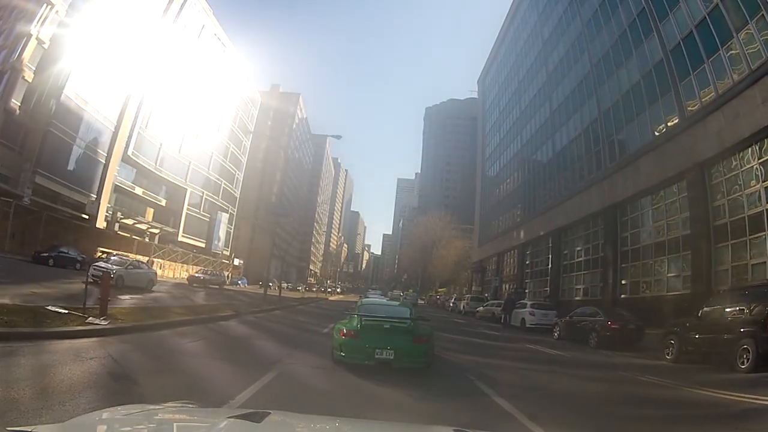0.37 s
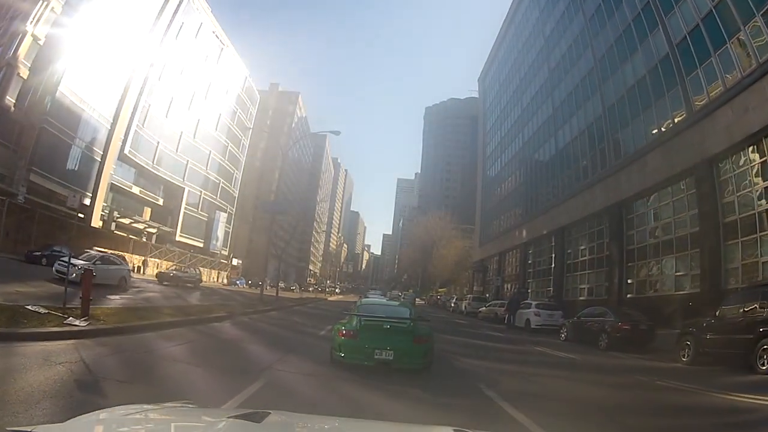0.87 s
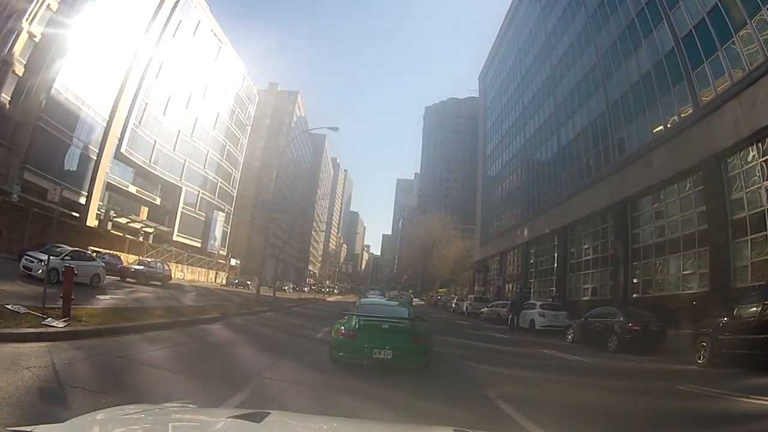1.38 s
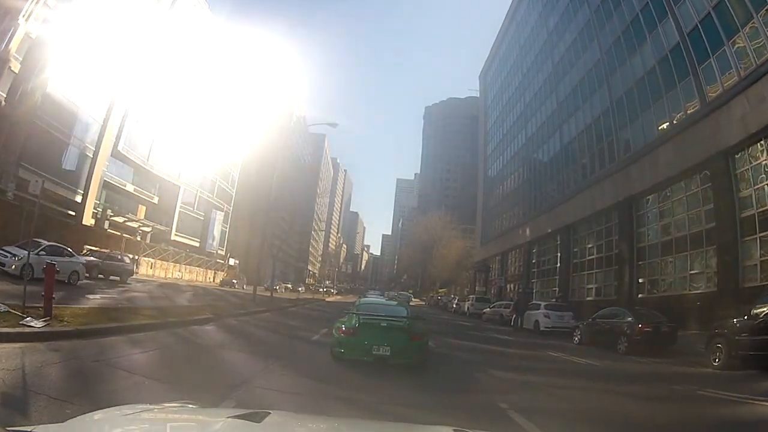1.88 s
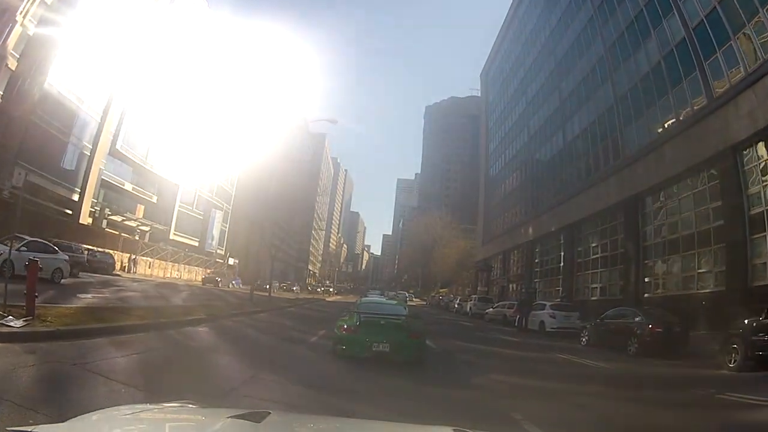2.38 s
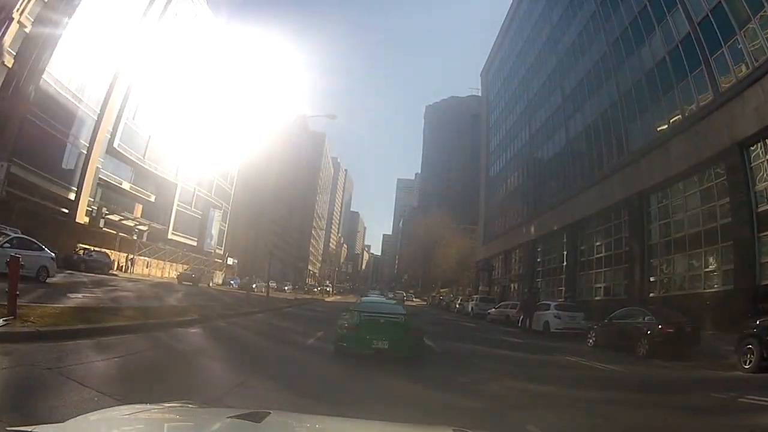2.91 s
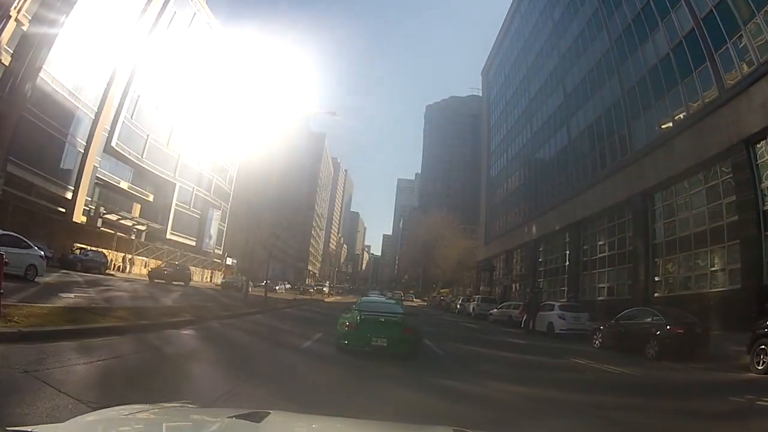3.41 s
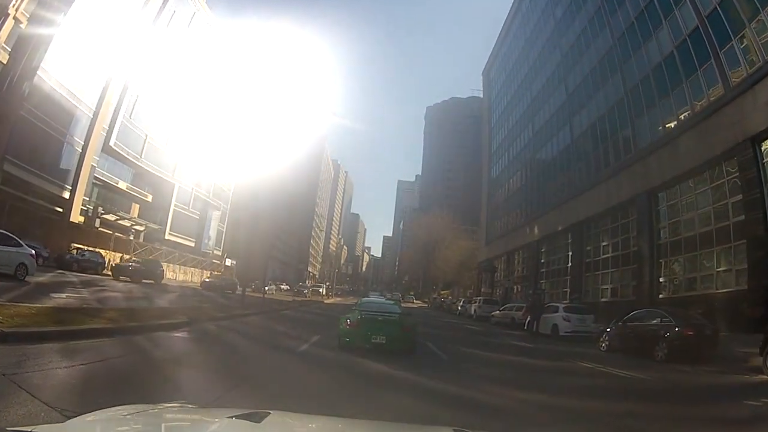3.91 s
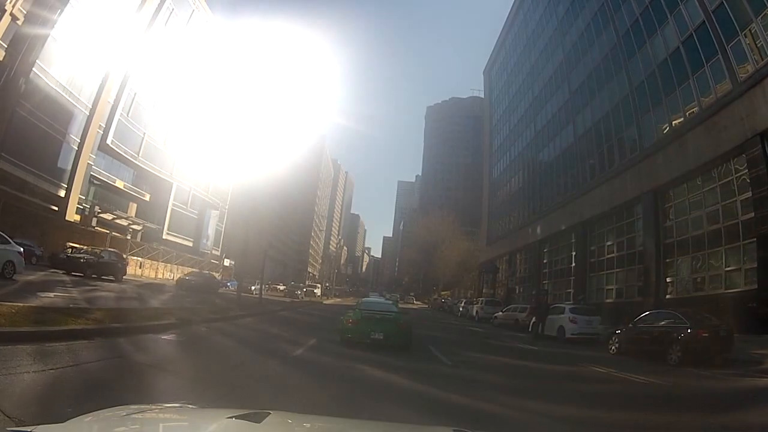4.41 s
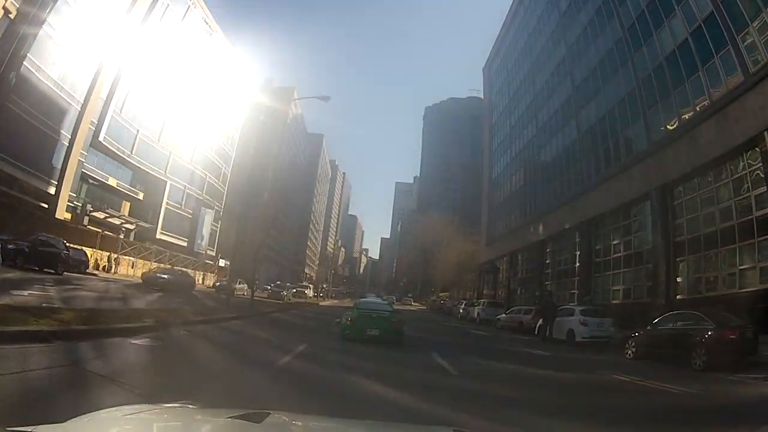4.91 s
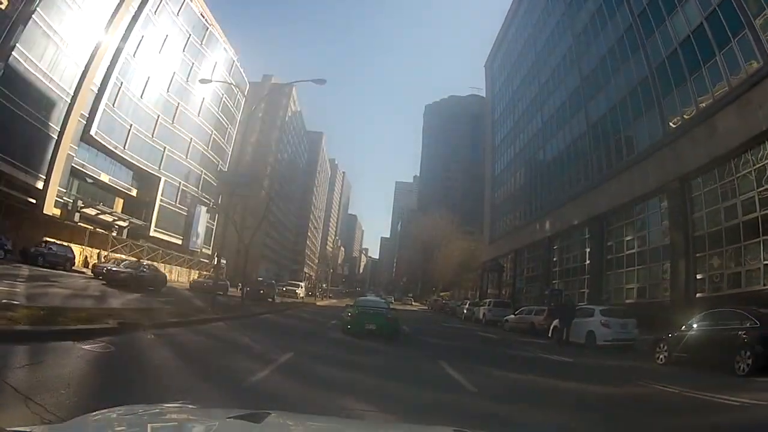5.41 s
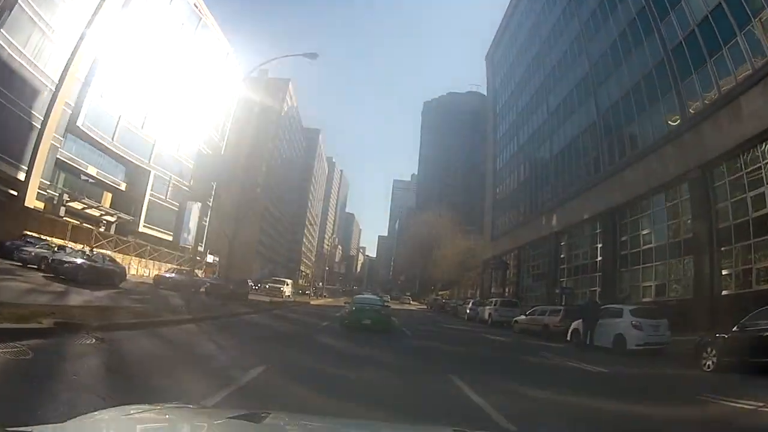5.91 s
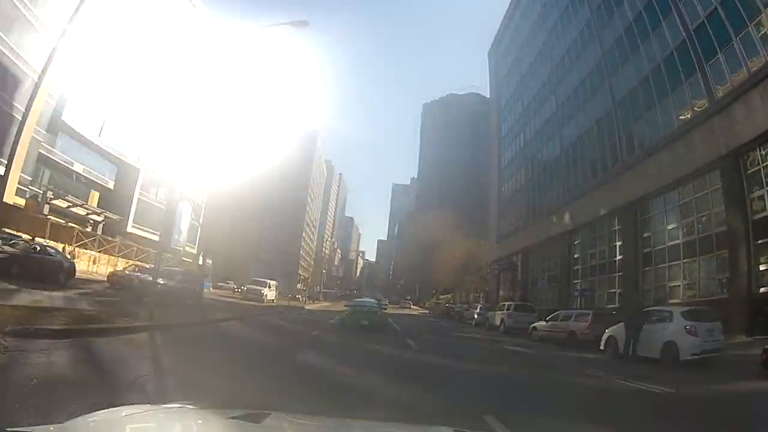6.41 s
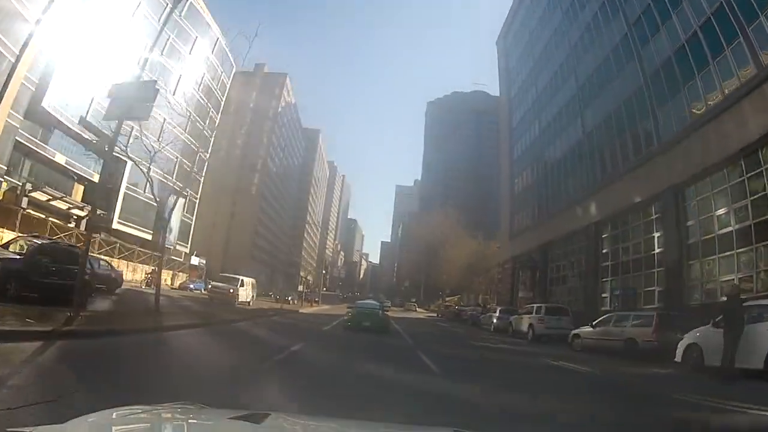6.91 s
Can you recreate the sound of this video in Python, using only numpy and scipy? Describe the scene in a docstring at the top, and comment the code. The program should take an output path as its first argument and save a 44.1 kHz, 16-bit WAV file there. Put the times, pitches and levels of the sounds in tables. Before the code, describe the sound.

A cheap small microphone inside a moving car picks up boomy road rumble, thuds and a rough low idle. Another car's engine wails up and down ahead; our own flares quickly, then falls back through a buzzing rattle. A further engine hums faintly. More surges follow before our engine pulls away, growing loud, hard and raspy at the end.

```python
"""A small camera's microphone inside a sports car, in a street between tall buildings.
From the start the idle is crank tones, firing-puffed roar and ringing cabin noise, over rumble and bumps.
Another car ahead, swept tones heard through resonances, revs in surges. Our engine is blipped and sags;
the trim rattles, struck on the shake, and a further engine hums as a single tone. At the end our car pulls away.
The microphone signal is sampled slowly and each value held, which mirrors the sound in the treble."""
import sys
import numpy as np
from scipy import signal
from scipy.fft import next_fast_len
from scipy.io import wavfile
from scipy.ndimage import uniform_filter1d

SR = 44100
rng = np.random.default_rng(int(sys.argv[2]) if len(sys.argv) > 2 else 0)


def transcribe(u):
    """Save the signal u as a 16-bit wav file named by the first command-line argument.

    u: samples, shape (n,) or (channels, n), limited to [-1, 1]; the rate is SR.
    q: integer samples, one column per channel.
    """
    v = np.clip(np.atleast_2d(u).T, -1, 1)
    q = np.round(v * 32767).astype(np.int16)
    wavfile.write(sys.argv[1], SR, q)


def convert_level_to_amplitude(level_db):
    """Map a level in decibels to its linear amplitude factor."""
    exponent = np.asarray(level_db, float) / 20
    return 10 ** exponent


N = 310905  # length in samples


def evened(x):
    """Scales to rms 1."""
    return x / np.sqrt(np.mean(x ** 2) + 1e-20)


def columns(rows):
    """Sample indices a table spans and its columns at each of them."""
    s, *rest = np.transpose(rows)
    at = np.arange(max(round(s[0] * SR), 0), min(round(s[-1] * SR), N))
    return at, [np.interp(at / SR, s, c) for c in rest]


def whole(rows):
    """Columns of a table at every sample of the scene."""
    s, *rest = np.transpose(rows)
    return [np.interp(np.arange(N) / SR, s, c) for c in rest]


def read(points, hz):
    """A (f/Hz, level/dB) table at the given frequencies."""
    f, level = np.transpose(points)
    return np.interp(np.log(hz), np.log(f), level)


def resonate(x, hz, width):
    """A fixed resonance of about unit gain at its peak."""
    pole = np.exp((2j * np.pi * hz - np.pi * width) / SR)
    return 2 * signal.lfilter([1 - abs(pole)], [1, -pole], x).real


def resonate_twice(x, hz, width):
    """The same resonance passed twice, for steeper skirts."""
    return resonate(resonate(x, hz, width), hz, width)


def wander(length, rate_hz):
    """Slow chance: normal random knots joined by straight lines."""
    knots = rng.standard_normal(int(length * rate_hz / SR) + 3)
    return np.interp(np.arange(length) * rate_hz / SR, np.arange(len(knots)), knots)


def noise(points, patchy_db):
    """Noise of rms 1 with a given spectrum and patches that drift over time and frequency."""
    frames, hz = N // 512 + 5, np.fft.rfftfreq(2048, 1 / SR)
    a, b, patches = rng.standard_normal((frames, 1025, 3)).T
    patches = evened(uniform_filter1d(uniform_filter1d(patches, 12, 0), 6, 1))
    f, level = np.transpose(points)
    shape = np.interp(np.log(hz + 1), np.log(f + 1), level)[:, None]
    spectrum = (a + 1j * b) * convert_level_to_amplitude(shape + patchy_db * patches)
    return evened(signal.istft(spectrum, nperseg=2048, noverlap=1536)[1][:N])


def tone(turns, multiple, level_db, waver_db):
    """One crank order; uneven burning and street echoes make its level and phase waver."""
    phase = 2 * np.pi * (multiple * turns + rng.random()) + 0.055 * wander(len(turns), 14)
    return np.sqrt(2) * convert_level_to_amplitude(level_db + waver_db * wander(len(turns), 14)) * np.cos(phase)


# crank of our own engine: (t/s, f/Hz in turns)
CRANK_SPEED = [(0.0, 16.2), (0.9, 16.4), (1.2, 17.5), (1.27, 19.3), (1.31, 22.8), (1.5, 53.9), (1.6, 66.2),
               (1.65, 68.3), (1.8, 69.2), (1.95, 67.1), (2.1, 61.9), (2.3, 51.7), (2.5, 46.0), (2.7, 40.9),
               (3.1, 26.8), (3.3, 21.2), (3.5, 17.6), (3.7, 16.4), (4.1, 20.5), (4.7, 22.8), (5.1, 20.2),
               (5.5, 23.5), (6.1, 29.8), (6.38, 35.0), (6.62, 42.3), (6.86, 51.2), (6.98, 57.7),
               (7.05, 60.7)]
# load and air of our own engine: (t/s, pull on the firing tones/dB, roar level/dB, hiss level/dB)
ENGINE_LOAD = [(0.0, -5, -56, -68.5), (0.39, -2.5, -50.5, -68.5), (0.88, -7, -47.5, -61),
               (1.2, -3, -49, -64.5), (1.33, 7, -47.5, -66), (1.43, 8.5, -46, -65.5),
               (1.5, 9, -40.5, -61.5), (1.6, 12, -35.5, -57.5), (1.68, 8, -31.5, -50.5),
               (1.78, 3, -36.5, -57.5), (2.1, 4, -39, -59.5), (2.17, -7, -41.5, -63), (2.32, 0, -42, -63.5),
               (2.5, -2.5, -44.5, -65.5), (3.05, -12.5, -48.5, -66), (3.3, -2.5, -45.5, -62.5),
               (4.0, -4, -47.5, -65), (4.5, 4, -44.5, -63.5), (4.85, -4.5, -42.5, -61),
               (5.5, -0.5, -41.5, -64), (6.2, 4, -40, -63), (6.46, 5, -39.5, -61.5), (6.51, 7, -36.5, -61),
               (6.6, 14, -35.5, -60), (6.85, 15, -31.5, -57), (6.95, 19, -30, -54.5),
               (7.05, 13, -28, -53.5)]
# once-a-turn shake before pull, largest where the crank turns at the body boom: (f/Hz in turns, level/dB)
SHAKE_BY_SPEED = [(16, -53), (24, -49), (30, -31), (37.5, -37), (41, -21.5), (44.5, -10.5), (48, -15.5),
                  (52, -29), (60, -37), (69, -32)]


def shake_level():
    """Level of the once-a-turn shake, which needs a moment to build up."""
    pull_share, build_s = 0.36, 0.056  # dB of shake per dB of pull; seconds
    keep = np.exp(-1 / (build_s * SR))
    steady = convert_level_to_amplitude(read(SHAKE_BY_SPEED, whole(CRANK_SPEED)[0]) + pull_share * whole(ENGINE_LOAD)[0])
    return signal.lfilter([1 - keep], [1, -keep], steady)


# road rumble under the cabin, apart from bumps: (t/s, level/dB)
ROAD_LEVEL = [(0.0, -33.5), (0.14, -33), (0.55, -29.5), (0.7, -34), (1.06, -29.5), (1.39, -23.5),
              (1.53, -22), (1.75, -23.5), (2.0, -25.5), (2.15, -25.5), (2.45, -24), (2.85, -26),
              (3.3, -29.5), (3.9, -29), (4.3, -26.5), (4.9, -23), (5.15, -27.5), (5.38, -20), (5.6, -27),
              (6.28, -20.5), (6.62, -25), (6.88, -19), (7.05, -30)]
# its spectrum at the microphone: (f/Hz, relative level/dB per Hz)
ROAD_SPECTRUM = [(12, -33.5), (26, -10.5), (36, -3), (43, 2), (58, -8), (72, -11.5), (97, -4.5), (192, 4.5),
                 (216, 3.5), (240, -6), (313, -30), (410, -11.5), (594, -31.5), (700, -26), (910, -67.5),
                 (1540, -120)]
# bumps that ring the body boom: (t/s of the peak, swing level/dB, length/s)
ROAD_BUMPS = [(0.132, -27.5, 0.12), (0.26, -33, .16), (0.481, -27, 0.217), (0.8, -32, 0.18),
              (1.04, -29.5, 0.26), (1.516, -30, .24), (1.84, -28, .16), (1.986, -32, .1), (2.536, -22, .25),
              (2.708, -31, .12), (2.853, -29, .09), (2.945, -21.5, 0.12), (3.081, -26, 0.076),
              (3.273, -19, 0.074), (3.452, -28, 0.77), (3.76, -30, 0.29), (3.998, -17.5, 0.175),
              (4.234, -38, 0.21), (4.44, -29, 0.29), (4.744, -20.5, 0.099), (4.859, -23.5, 0.13),
              (5.092, -24.5, .18), (5.24, -25.5, .1), (5.384, -24, 0.37), (5.757, -22.5, 0.18),
              (6.008, -19.5, 0.38), (6.193, -18, 0.092), (6.572, -17, 0.34), (6.963, -20.5, .24)]


def road():
    """Bumps ring the body boom where the crank shake does not already drive it, over a lumpy rumble."""
    rest_db, bump_rumble_db = -43, -18.5  # boom between bumps; rumble relative to a bump's swing
    t = np.arange(N) / SR
    jolts = sum(convert_level_to_amplitude(db) * np.cos(np.pi * np.clip((t - s) / length, -.5, .5)) ** 2
                for s, db, length in ROAD_BUMPS)
    swing = jolts + convert_level_to_amplitude(rest_db)
    free = np.clip(1 - 1.2 * shake_level() / swing, .1, 1)
    boom = resonate_twice(rng.standard_normal(N), hz=44.97, width=7.4)
    envelope = abs(signal.hilbert(boom, next_fast_len(N))[:N])
    steadier = boom / (envelope / boom.std() + .35)  # less uneven than pure chance
    rumble = np.hypot(convert_level_to_amplitude(whole(ROAD_LEVEL)[0]), convert_level_to_amplitude(bump_rumble_db) * jolts)
    return swing * free * evened(steadier) + rumble * noise(ROAD_SPECTRUM, patchy_db=2.5)


# a further engine, one table a passage: (t/s, firing f/Hz, level/dB)
FURTHER_ENGINE = [
    [(2.5, 175.3, -49), (2.75, 186.5, -18.5), (2.9, 196.9, -28), (3.0, 197, -23.5), (3.15, 200, -31),
     (3.3, 204.8, -28.5), (3.5, 211.4, -28.5), (3.7, 217.8, -34)],
    [(4.1, 190, -36), (4.2, 187.4, -26), (4.35, 188.6, -29.5), (4.5, 192.8, -23.5), (4.7, 195, -26),
     (4.9, 197, -25), (5.05, 195, -24.5)],
    [(5.0, 171.7, -40), (5.3, 174.7, -33.5), (5.45, 180.4, -32), (5.6, 185.8, -27.5), (5.8, 192.2, -26),
     (6.1, 200.5, -47), (6.3, 201.7, -28), (6.4, 204.3, -18), (6.5, 208.2, -22.5)],
]


def further_engine():
    """A third engine hums on its firing tone, each passage fading in and out."""
    out = np.zeros(N)
    for rows in FURTHER_ENGINE:
        at, (hz, db) = columns(rows)
        hum = tone(np.cumsum(hz) / SR, 1, db, waver_db=3.9)
        out[at] += hum * signal.windows.tukey(len(at), .12)
    return out


# the car ahead, one table a surge: (t/s, crank f/Hz in turns, level/dB before street and cabin)
AHEAD_SURGES = [
    [(0.4, 59.5, -46.5), (0.5, 62.84, -50.5), (0.7, 75.6, -29.5), (0.9, 80.3, -30.5), (1.0, 79.23, -29.5),
     (1.3, 71.85, -34.5), (1.5, 70.1, -39)],
    [(1.9, 80.9, -48), (2.0, 83.05, -26), (2.1, 85.36, -35), (2.2, 79.69, -29.5), (2.4, 76, -47)],
    [(3.0, 70.45, -53.5), (3.1, 76.13, -39), (3.2, 79.19, -33.5), (3.32, 86.53, -33), (3.5, 89.2, -33),
     (3.6, 85.45, -30.5), (3.8, 78.22, -36.5), (4.0, 71.07, -33.5), (4.12, 69.4, -45), (4.22, 70.97, -34),
     (4.4, 77.76, -32.5), (4.6, 89.32, -27), (4.8, 94.06, -28.5), (5.0, 97.16, -28)],
    [(5.0, 71, -25), (5.12, 70.73, -36), (5.22, 71.9, -30), (5.5, 80.07, -24), (5.7, 84.45, -27),
     (5.8, 83.5, -32), (5.9, 91.86, -41)],
]
# one row a surge: (second order/dB, upper orders/dB), both relative to the surge's level
AHEAD_BALANCE = [(-3.5, -10), (-5.5, -3), (-5, -6.5), (-19, 1)]
# its upper crank orders: (multiple of the crank, relative level/dB)
AHEAD_UPPER = [(4.5, -16.5), (5, -22.5), (6, -17.5), (9, -25)]
# how street and cabin pass its tones: (f/Hz, gain/dB)
STREET_AND_CABIN = [(120, -5), (140, -3), (165, 1), (185, 8.5), (200, 10), (215, 6.5), (240, 3.5),
                    (270, -8.5), (292, -17)]


def car_ahead():
    """Crank orders of the car ahead rise and fall in surges, the upper ones let in by two cabin resonances."""
    out = np.zeros(N)
    for rows, (low_db, bright_db) in zip(AHEAD_SURGES, AHEAD_BALANCE):
        at, (hz, level_db) = columns(rows)
        second_db = level_db + low_db + read(STREET_AND_CABIN, 2 * hz)
        firing_db = level_db + read(STREET_AND_CABIN, 3 * hz)
        turns = np.cumsum(hz) / SR
        surge = tone(turns, 2, second_db, waver_db=2.5) + tone(turns, 3, firing_db, waver_db=1.13)
        upper = sum(tone(turns, k, level_db + bright_db + db, waver_db=2.5) for k, db in AHEAD_UPPER)
        surge += resonate(upper, 402, 32) + resonate(upper, 698, 90)
        out[at] += surge * signal.windows.tukey(len(at), .12)
    return out


# cabin modes around the microphone: (t/s of the start, f/Hz, level/dB, length/s)
SWEPT_MODES = [(1.399, 269.3, -30, 0.22), (1.463, 380.7, -28, 0.17), (1.51, 546, -28.5, 0.16),
               (1.559, 920, -44, 0.097), (1.664, 1105, -38.5, 0.2), (1.918, 1083, -37.5, 0.078),
               (2.26, 482, -37.5, 0.13), (3.854, 268.4, -37.5, 0.16), (1.43, 46.1, -20, .18),
               (6.78, 45.9, -10.5, .27)]


def swept_modes():
    """Cabin modes that keep sounding for a moment after a crank order sweeps through them."""
    out = np.zeros(N)
    for s, hz, db, length in SWEPT_MODES:
        t = np.arange(round(length * SR)) / SR
        ring = tone(hz * t, 1, db, waver_db=3.5) * signal.windows.tukey(len(t), .6)
        out[round(s * SR):][:len(t)] += ring
    return out


# spectrum of the hiss in the cabin: (f/Hz, relative level/dB per Hz)
HISS_SPECTRUM = [(1530, -42.5), (2600, -23), (3240, -11.5), (3640, 0.5), (3860, -3), (4490, -10.5),
                 (4830, -12.5), (5290, -12.5), (6000, -17), (7800, -62), (13200, -120)]


def hiss_and_grit(hiss_db):
    """Air hisses, and grit flecking the body strikes a panel resonance at random."""
    fleck = rng.random(N) < 45 / SR  # 45 a second on average
    grit = convert_level_to_amplitude(4. * np.minimum(rng.exponential(1, N), 3)) * fleck
    out = convert_level_to_amplitude(hiss_db - 12.0) * evened(resonate_twice(grit, 4300, 420))
    return out + convert_level_to_amplitude(hiss_db) * noise(HISS_SPECTRUM, patchy_db=1.9)


# rasps as the engine pulls: (t/s of the peak, peak level/dB, half length/s, f/Hz)
PULL_RASPS = [(1.7, -46, .05, 2640), (6.51, -45.5, .02, 2510), (6.82, -37, .011, 2300)]


def rasps():
    """Short swells of resonant noise."""
    out = np.zeros(N)
    air = rng.standard_normal(N)
    for s, db, half, f in PULL_RASPS:
        swell = np.exp(-((np.arange(N) / SR - s) / half) ** 2)
        out += convert_level_to_amplitude(db) * swell * evened(resonate_twice(air, f, width=480))
    return out


# spectrum of the engine's roar in the cabin: (f/Hz, relative level/dB per Hz)
ROAR_SPECTRUM = [(180, -32.5), (300, -0.5), (328, -19), (382, -3), (439, -9.5), (542, -13.5), (588, -15),
                 (786, -18), (1110, -14.5), (1300, -26), (1860, -18), (2590, -25), (3300, -37), (4290, -77),
                 (7260, -120)]


def roar(turns, roar_db):
    """Broad noise puffed by each firing, three to a crank turn."""
    puffs = 1 + 0.069 * np.cos(2 * np.pi * 3 * turns)
    return convert_level_to_amplitude(roar_db) * puffs * noise(ROAR_SPECTRUM, patchy_db=2.0)


def ring_level(hz, pull_db):
    """Cabin rings, in dB, grow with crank speed and pull and need a moment to follow."""
    idle_db, db_per_octave, pull_share, build_s = -66, 10.5, 0.52, .025
    ring_db = idle_db + db_per_octave * np.log2(hz / CRANK_SPEED[0][1]) + pull_share * pull_db
    keep = np.exp(-1 / (build_s * SR))
    return ring_db[0] + signal.lfilter([1 - keep], [1, -keep], ring_db - ring_db[0])


# cabin resonances that stand out of the roar:
# (f/Hz, width/Hz, relative level/dB, share by which it follows the ring level rather than the roar)
CABIN_RINGS = [(383.1, 25, 6.5, 0.3), (413, 45, 3.5, 0), (483.9, 21, 0.5, 0.2), (546, 20, -0.5, 0.93),
               (658, 60, 1, 0.6), (920, 35, -5.5, 0.5), (1028, 140, 1, 1.), (1106, 69, 1, 1.),
               (1460, 47, -7, 0.7), (1844, 130, -3.5, 0.01), (2542, 520, -12, -.2)]


def cabin_rings(turns, hz, ring_db, roar_db):
    """Resonances fed by steady noise and one uneven knock a turn, which holds every whole order."""
    under_roar_db, knock_share = 8, .3
    once_a_turn = np.diff(np.floor(turns), prepend=np.floor(turns[0]))
    knocks = convert_level_to_amplitude(2.5 * wander(N, 33)) * once_a_turn
    drive = knock_share * evened(knocks * np.sqrt(SR / hz)) + rng.standard_normal(N)
    out = np.zeros(N)
    for f, width, db, share in CABIN_RINGS:
        level_db = db + share * ring_db + (1 - share) * (roar_db - under_roar_db)
        out += convert_level_to_amplitude(level_db) * evened(resonate_twice(drive, f, width))
    return out


# trim rattling with the boom: (t/s, strike at each trough/dB, first rebound/dB, second rebound/dB), relative
TRIM_RATTLE = [(2.43, -57.5, -74, -77.5), (2.47, -55, -68.5, -70), (2.52, -47.5, -54, -54.5),
               (2.6, -45.5, -46.5, -51.5), (2.65, -44.5, -48, -56), (2.7, -59.5, -78.5, -75)]
# stray ticks of the trim: (t/s, relative level/dB)
TRIM_TICKS = [(1.492, -52.5), (1.515, -47.5)]
# resonances of the panel: (f/Hz, width/Hz, relative level/dB)
TRIM_PANEL = [(3740, 1600, 7.5), (4880, 4500, 3)]


def trim(turns):
    """Strikes at each trough of the shake with uneven rebounds, and stray ticks, all ringing the same panel."""
    at, levels_db = columns(TRIM_RATTLE)
    blows = np.zeros(N)
    for lag, db in zip((0, .62, .85), levels_db):  # lag in turns
        late = turns - lag + 0.03 * wander(N, 46)
        struck = np.diff(np.floor(np.maximum.accumulate(late)), prepend=0)[at] > 0
        blows[at] += convert_level_to_amplitude(db + wander(len(at), 110)) * struck
    for s, db in TRIM_TICKS:
        blows[round(s * SR)] += convert_level_to_amplitude(db)
    decay = np.exp(-1 / (.002 * SR))  # 2 ms
    scrape = rng.standard_normal(N) * signal.lfilter([1], [1, -decay], blows)
    return convert_level_to_amplitude(4.0) * sum(convert_level_to_amplitude(db) * resonate(scrape, f, width) for f, width, db in TRIM_PANEL)


# second firing tone before the cabin colours it: (t/s, level/dB)
SECOND_FIRING = [(0.0, -43), (1.2, -37), (1.33, -37.5), (1.4, -31), (1.47, -33), (1.55, -31), (1.67, -40),
                 (1.8, -31), (1.97, -27.5), (2.07, -39), (2.38, -52), (2.52, -36), (2.62, -47),
                 (2.9, -41.5), (3.7, -48), (4.05, -34), (5.1, -33), (5.6, -37.5), (6.15, -39),
                 (6.27, -26.5), (6.42, -45), (6.52, -28.5), (6.8, -26.5), (7.05, -21.5)]
# third firing tone, under full throttle: (t/s, level/dB)
THIRD_FIRING = [(6.4, -57), (6.5, -32.5), (6.61, -26), (6.72, -30), (6.82, -36), (6.95, -33), (7.05, -20)]
# weaker crank orders: (multiple of the crank, level over the ring level/dB)
WEAKER_ORDERS = [(1.5, 1), (2, 10), (2.5, 8.5), (4, -3.5), (4.5, -9.5), (5, -8), (5.5, -8), (7, -1.5),
                 (7.5, -8), (8, -2.5), (10, -5.5), (10.5, -8), (12, -6.5), (15, -10)]
# how the cabin passes our own engine's tones to the microphone: (f/Hz, gain/dB)
CABIN_GAIN = [(45, -0.5), (65, 0.5), (90, -4), (115, 1), (140, -3.5), (165, -1), (185, 7), (200, 13.5),
              (215, 7.5), (240, 6), (270, 7), (300, 5), (330, -10.5), (365, 0), (385, -1.5), (412, -1.5),
              (480, 2), (515, -10), (546, -5), (620, -8)]


def crank_tones(turns, hz, pull_db, ring_db):
    """The once-a-turn shake, three firing tones at 3, 6 and 9 times the crank, and weaker orders."""
    firing_db = -31.5 + pull_db + read(CABIN_GAIN, 3 * hz)
    second_db = whole(SECOND_FIRING)[0] + read(CABIN_GAIN, 6 * hz)
    out = -np.sqrt(2) * shake_level() * np.cos(2 * np.pi * turns)
    out += tone(turns, 3, firing_db, waver_db=0.24)
    out += tone(turns, 6, second_db, waver_db=2.0)
    out += tone(turns, 9, whole(THIRD_FIRING)[0], waver_db=1.5)
    for k, db in WEAKER_ORDERS:
        out += tone(turns, k, ring_db + db + read(CABIN_GAIN, k * hz), waver_db=2.5)
    return out


def own_engine():
    """Crank turns and load drive the tones, roar, cabin rings, air and rattling trim."""
    trough_s = 2.5103  # a trough of the shake falls here
    (hz,) = whole(CRANK_SPEED)
    pull_db, roar_db, hiss_db = whole(ENGINE_LOAD)
    ring_db = ring_level(hz, pull_db)
    turns = np.cumsum(hz) / SR
    turns = turns - turns[round(trough_s * SR)]
    out = hiss_and_grit(hiss_db) + rasps() + roar(turns, roar_db)
    out += cabin_rings(turns, hz, ring_db, roar_db) + trim(turns)
    return out + crank_tones(turns, hz, pull_db, ring_db)


def scene():
    """All sources at one microphone in the cabin."""
    return (road() + further_engine() + car_ahead() + swept_modes() + own_engine())[None]


def low_pass(x):
    """Removes everything above the highest recorded frequency."""
    return signal.sosfilt(signal.butter(12, 15180, fs=SR, output="sos"), x)


def record(dry):
    """The input stage rounds off the peaks, then samples at 12 kHz and holds each value for four steps."""
    hold_up, hold_down, held_steps, edge_s = 40, 147, 4, .004
    squeezed = .4 * .95 * np.tanh(dry / .95) + .6 * np.clip(dry, -.95, .95)
    slow = signal.resample_poly(squeezed, hold_up, hold_down, axis=1, padtype="reflect")
    held = np.repeat(slow, held_steps, axis=1)  # the steps mirror the sound in the treble
    x = signal.resample_poly(held, hold_down, held_steps * hold_up, axis=1, padtype="reflect")[:, :N]
    x = np.pad(x, ((0, 0), (0, N - x.shape[1])), "reflect")
    mix = x * signal.windows.tukey(N, 2 * edge_s * SR / N)  # short fades at both ends
    return low_pass(mix)


dry = scene()
out = record(dry)
transcribe(out)
```